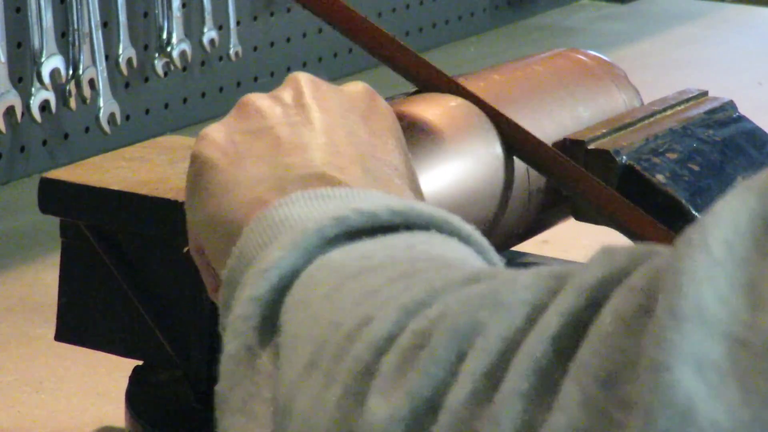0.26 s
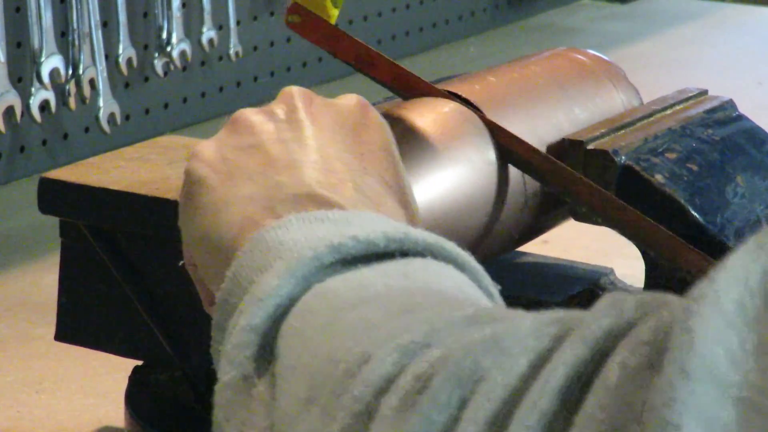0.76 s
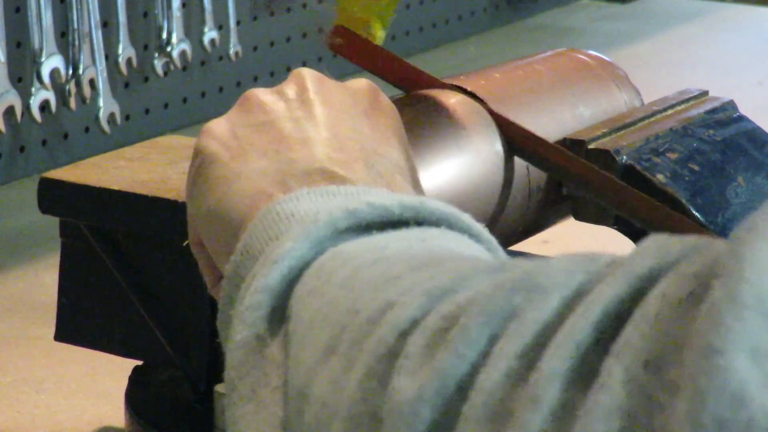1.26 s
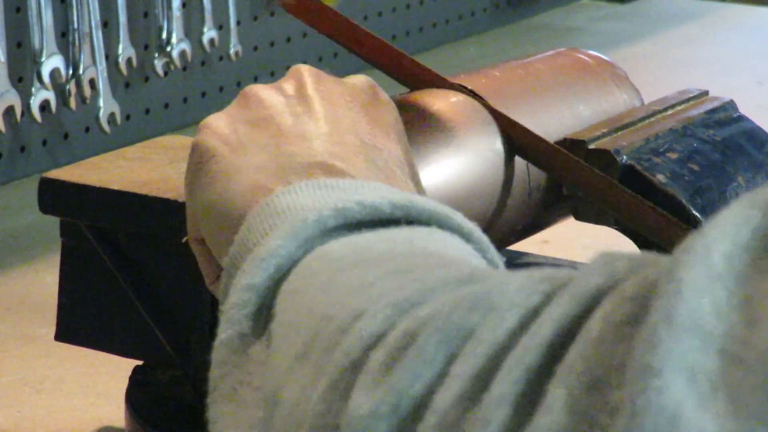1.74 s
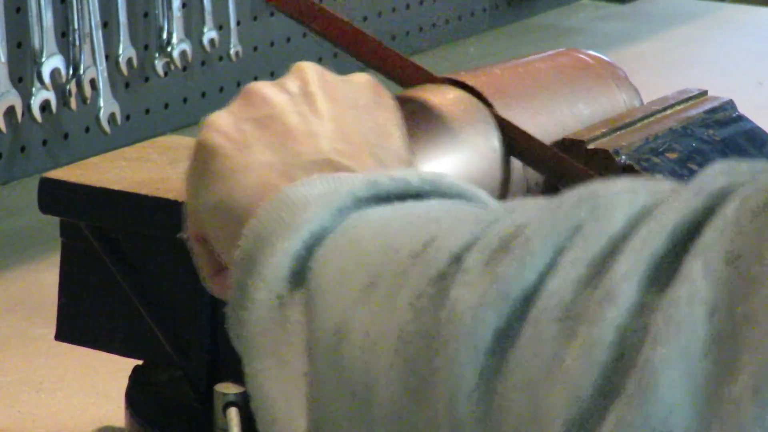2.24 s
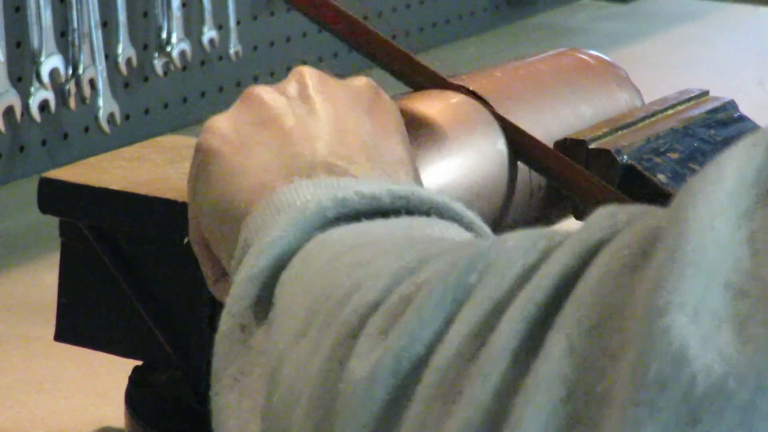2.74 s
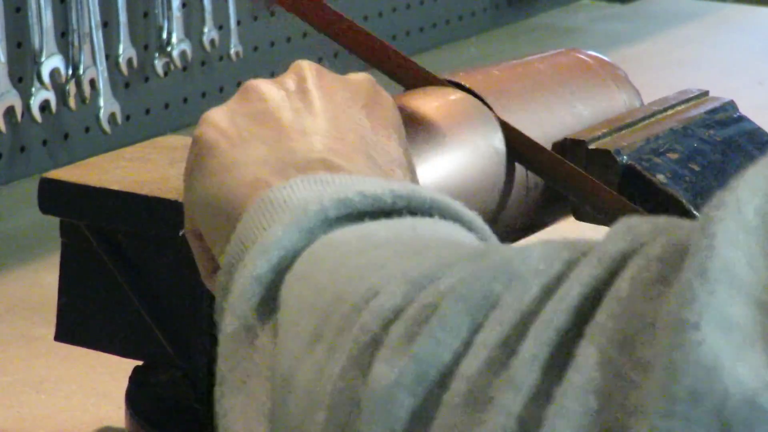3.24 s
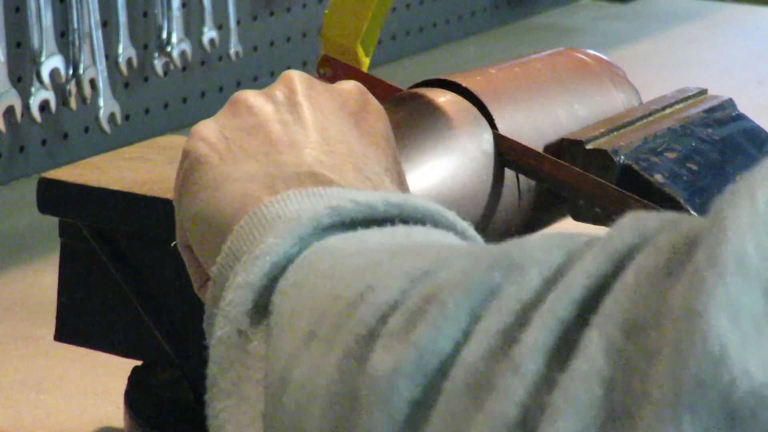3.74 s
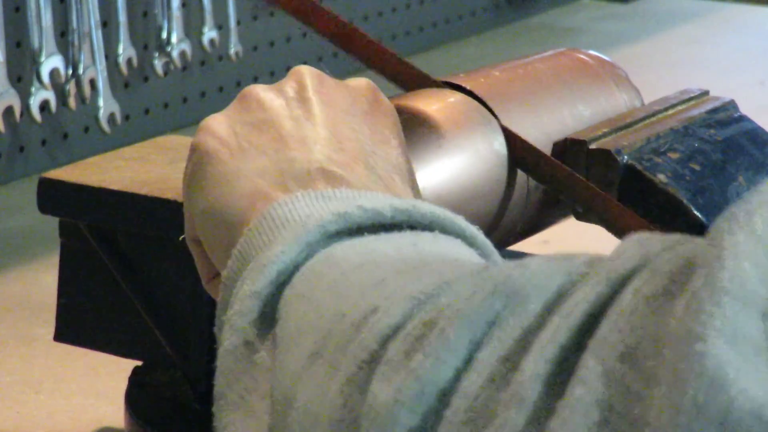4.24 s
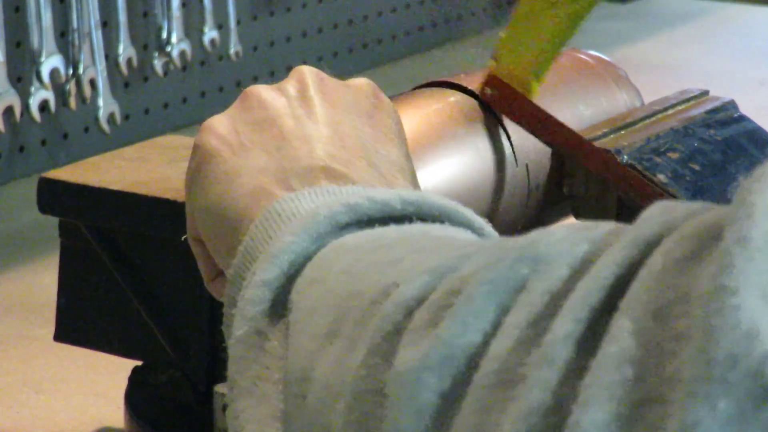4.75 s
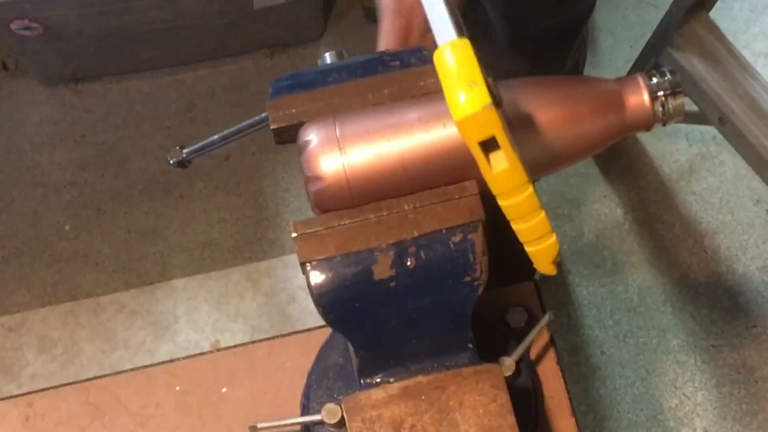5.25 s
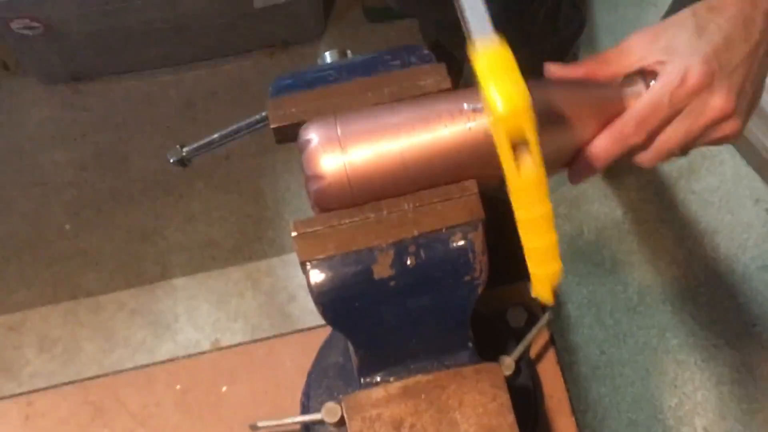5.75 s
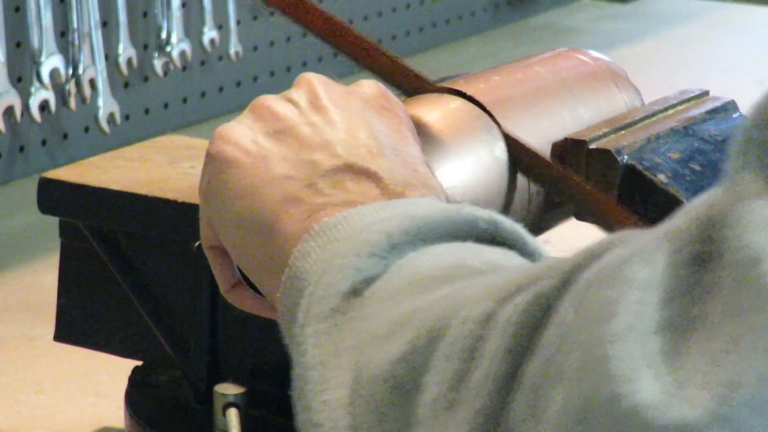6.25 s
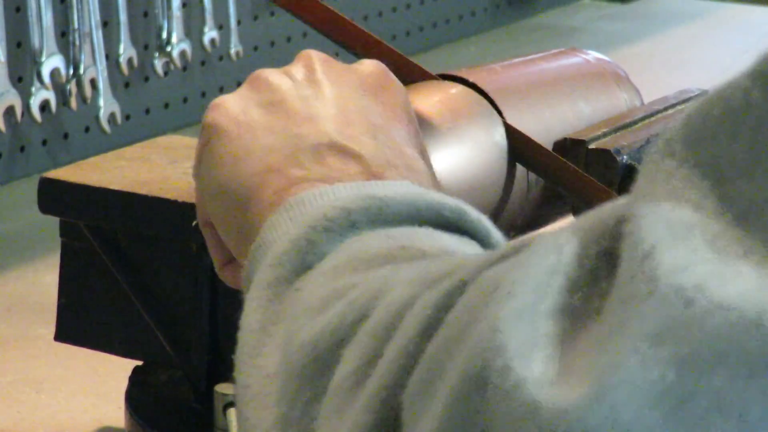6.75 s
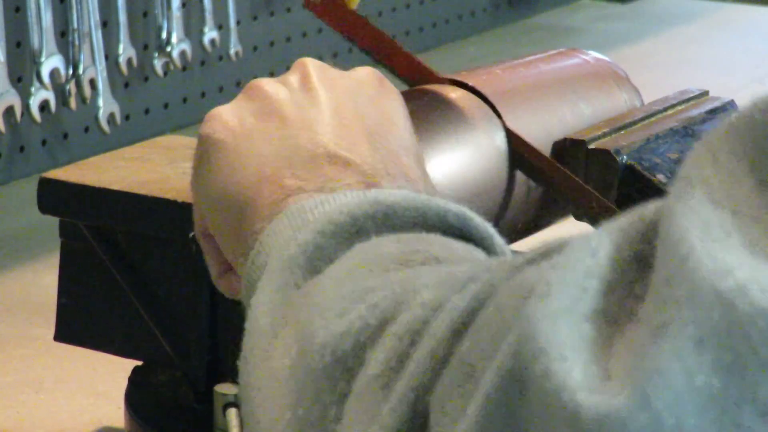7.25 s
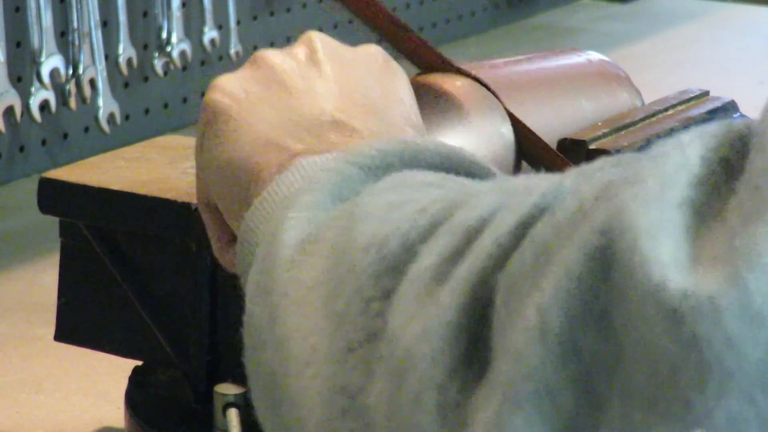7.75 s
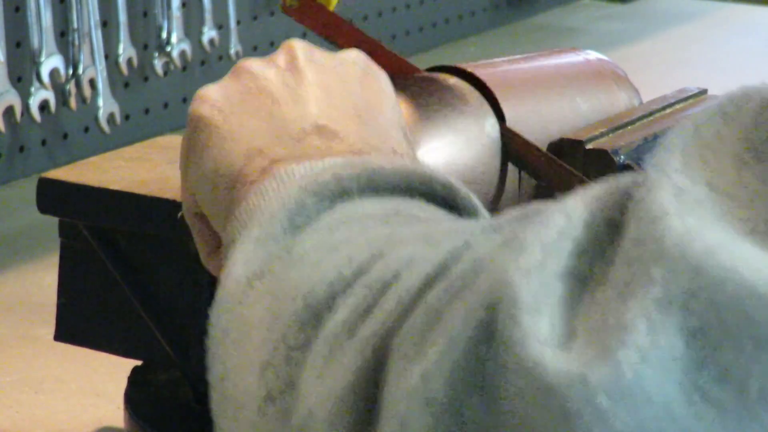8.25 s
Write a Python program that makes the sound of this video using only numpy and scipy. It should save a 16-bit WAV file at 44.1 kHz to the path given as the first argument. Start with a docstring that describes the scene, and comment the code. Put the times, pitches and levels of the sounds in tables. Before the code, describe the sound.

From the first instant a hacksaw rasps through a thin steel bottle in a vise, heard close from the side in stereo in a small workshop with a short echo. Strokes come fast, roughly six or seven a second, each a gritty burst with hollow ringing around 1 to 2 kHz and bright hiss. They vary in force, with small gaps near 0.8 and 1.7 seconds, and the loudest add low microphone crackle and thuds. From about 3.7 the strokes grow sparser and weaker. At 4.87 the sound becomes mono and overhead: quiet room tone, faint scrapes, a sharp tap near 5.27, then a cluster of clinks and knocks at 5.5 to 5.75 and short bright scratches until 6.05. A low rumble swells around 6.0. At 6.3 the strong, regular wide sawing resumes, crackling near 7.75 and 8.1, continuing until the end at about 8.5.

```python
"""In a small workshop, a hacksaw rasps through a thin steel bottle clamped in a bench vise. A stereo microphone
on the bench hears it from the side; for a while the scene changes to a mono microphone overhead, while the
blade is set back in the cut. The rasp is random tooth noise, shaped by each stroke and by the ringing steel;
blade taps are fading tones and noise. The low crackle of the overloaded microphone, the echo and the steady
room tone, which runs on through both views, are filtered noise."""
import sys
import numpy as np
from scipy import signal
from scipy.fft import rfft, irfft, next_fast_len
from scipy.io import wavfile
from scipy.ndimage import uniform_filter1d, map_coordinates

SR = 44100
rng = np.random.default_rng(int(sys.argv[2]) if len(sys.argv) > 2 else 0)


def wrap_up_sound(samples):
    """Save the sound to the file named by the first command line argument, as 16-bit audio."""
    columns = np.atleast_2d(samples).T
    # keep every value between -1 and 1, then stretch to whole-number steps
    tamed = np.clip(columns, -1, 1)
    steps = np.round(tamed * 32767).astype(np.int16)
    wavfile.write(sys.argv[1], SR, steps)


N = 374850

# Saw strokes and scrapes. Each row: start in seconds, attack in seconds, hold in seconds, rasp level in dB,
# change over the hold in dB, low shell modes in dB above the rasp, chip hiss in dB above the rasp,
# upper over lower half of the low modes in dB, upper over lower half of the rasp in dB.
SAW_STROKES = [(-0.044, 0.044, 0.0086, -22.5, -4, -3, -9, 0, 2.5),
               (0.038, 0.026, 0.055, -17.0, -0.5, -7, -7.5, -2, 1),
               (0.191, 0.004, 0.072, -21, 4, -5, -8, 1, 0),
               (0.331, 0.019, 0.037, -17, 2.0, -6.5, -7.5, -1.5, 1.5),
               (0.439, 0.021, 0.071, -17, 0.0, -3.5, -8.5, 6, -1.0),
               (0.589, 0.054, 0.014, -11.5, -4.5, -9, -8.5, -5, -1.5),
               (0.711, 0.012, 0.008, -25.5, -1, 0, -11, 5, -3),
               (0.895, 0.032, 0.048, -18.5, 0, -4.5, -9, -3.0, 3),
               (1.079, 0.0057, 0.093, -12.5, -3, -4.5, -9, 1.5, -1.5),
               (1.266, 0.015, 0.03, -17, 2, -7.0, -6.0, -3, 5),
               (1.369, 0.024, 0.088, -15.0, 0.5, -6, -9, 4.0, 1.5),
               (1.553, 0.014, 0.052, -17.5, -2, -6.5, -4.5, -2.0, 1),
               (1.832, 0.044, 0.03, -20, 1, -5, -5.5, -2, 3),
               (1.95, 0.0078, 0.022, -21, -10.0, -8.5, -17, 1, -4),
               (2.129, 0.047, 0.005, -19, 0, -7.5, -6, -3.5, 3.5),
               (2.269, 0.026, 0.084, -13.5, -3, -6.5, -6, 4.5, 1.5),
               (2.507, 0.064, 0.026, -20.5, -1.5, -5.5, -5.5, -1, 1),
               (2.636, 0.033, 0.058, -14.5, -0.5, -4.5, -6.0, 3.5, 0.5),
               (2.795, 0.043, 0.037, -17, -1.5, -6, -4.5, 2.5, -0.5),
               (2.926, 0.0044, 0.073, -18, 2.5, -6.5, -6.5, 3, -1),
               (3.07, 0.018, 0.051, -20.0, 1.5, -5.5, -5, -3.0, 3.5),
               (3.199, 0.0053, 0.056, -16, -3, -7.5, -6.5, -0.5, -1),
               (3.338, 0.02, 0.047, -16, -0.5, -7.5, -5, -2.0, 1.5),
               (3.451, 0.002, 0.008, -24, -4, -11, -2, 2, 8),
               (3.492, 0.0025, 0.098, -20, -4.5, -5.5, -5.0, 1.0, 3.5),
               (3.664, 0.03, 0.055, -20, -8.5, -7, -8, 0.0, 1),
               (3.932, 0.038, 0.025, -26, -0.5, -5.0, -6.5, -3, 1),
               (4.067, 0.028, 0.083, -17.5, -9, -8.5, -4.0, 0, 3.5),
               (4.36, 0.016, 0.089, -29.5, 4.5, -6.5, -8, -2, 1.5),
               (4.547, 0.0036, 0.008, -19, -5, -9.5, -2, 0.0, 4.5),
               (4.594, 0.0027, 0.018, -16, -2.5, -8, -4.5, -2, 5.5),
               (4.705, 0.023, 0.061, -20.5, -0.5, -5.5, -6.0, -4.5, 3),
               (5.07, 0.004, 0.081, -54.5, -4, -4, -11, 1, 2.0),
               (5.166, 0.004, 0.064, -46.0, -9, 3, -8, 0, 4.0),
               (5.267, 0.004, 0.008, -31, -5.5, 3, 3.5, 0.0, 2),
               (5.308, 0.004, 0.097, -41.5, -8.5, -2, -7.5, 3, 2),
               (5.485, 0.004, 0.091, -38.5, -6.5, -0.5, -3, 5, 6.0),
               (5.593, 0.0025, 0.0056, -23, -5, -12, -1.5, 2.5, 6.5),
               (5.642, 0.0033, 0.03, -31.0, -4.5, -8, -5.5, 5, -4),
               (5.721, 0.002, 0.007, -31, -5.5, -5, -10, 0.5, 7),
               (5.747, 0.0027, 0.02, -19, -2.0, -11.5, 3, 4, 4),
               (5.794, 0.0044, 0.032, -21.5, 2, -10, 0.5, 3, 1.5),
               (5.95, 0.043, 0.03, -21, -2, -10, -1, 2, 3),
               (6.033, 0.011, 0.0072, -26, -2.5, -3.5, 4, -7, 1),
               (6.319, 0.021, 0.006, -13.5, -3, -9, -5, -5, 4),
               (6.458, 0.0029, 0.072, -13.5, -1.0, -4.0, -7, -2, 3),
               (6.623, 0.033, 0.066, -14, -6.5, -7.5, -6.0, -6, 1.5),
               (6.788, 0.0083, 0.087, -16, 1, -6, -8, -1.0, 3),
               (6.956, 0.053, 0.035, -15, -5.0, -7, -5.5, -4, 1),
               (7.096, 0.004, 0.065, -16.5, 1.5, -5.5, -6.5, 1, 1.5),
               (7.25, 0.013, 0.061, -18, -1.5, -7, -5.5, -2.5, 1),
               (7.378, 0.004, 0.008, -23, -3.5, -9.5, -5.5, 2, 6),
               (7.541, 0.057, 0.043, -18, -4.5, -4, -8, -5.5, 1.5),
               (7.672, 0.011, 0.12, -15.5, -0.5, -7, -5, 3.5, 3.5),
               (7.871, 0.04, 0.056, -18.5, -4, -5, -7, -4, -1.5),
               (8.009, 0.024, 0.077, -17, -2.5, -4, -5, 0.5, 1.5),
               (8.181, 0.004, 0.081, -22.5, -3.5, -4, -7, -5, 1),
               (8.458, 0.046, 0.02, -22.5, 0.0, -4.5, -7.5, -8, 3)]
# Sudden grabs of the teeth. Each row: time in seconds, peak in dB before the offset of each band.
TOOTH_BITES = [(0.0633, -14), (0.3506, -26), (0.612, -19), (0.9104, -28), (1.081, -24), (2.294, -26),
               (2.8176, -18), (3.495, -23), (3.5279, -14), (4.084, -25), (4.16, -29), (5.993, -25),
               (6.33, -25), (6.461, -24), (6.4924, -22), (6.5194, -24), (6.6336, -23), (6.794, -23),
               (6.9833, -15), (7.681, -22), (8.0213, -26)]
# Five bands: two of low modes, two of rasp, one of hiss. Each row: lower edge in Hz, upper edge in Hz.
RASP_BANDS = [(60, 827), (900, 1196), (1350, 2027), (2100, 4540), (4700, 30000)]
# How fast each band dies as the blade slows. One value per band, in dB per second.
RELEASE_SPEEDS = [-270, -270, -290, -310, -320]
BITE_BAND_OFFSETS_DB = [-15, -2.5, 0, -2.5, -6.5]  # one value per band, added to the bite's peak
# Ringing of the bottle's shell. Each row: frequency in Hz, width in Hz, level in dB over the direct sound.
BOTTLE_MODES = [(556, 14, -8), (743, 32, 3), (825, 120, -0.5), (966, 22, 4), (1093, 75, 12.5),
                (1596, 126, 4), (1690, 16, -4.5), (1804, 30, 8), (1850, 35, 8), (1960, 66, -11),
                (2197, 34, 1.5), (2360, 110, 2), (2550, 24, -13), (2690, 63, -3.5), (3191, 46, 6),
                (3417, 110, -0.5), (4074, 44, 1.5), (4220, 23, -28), (5210, 14, -2), (5305, 37, 1.5)]
# Tone of the rasp from the side, before each band is evened out. Each row: frequency in Hz, relative dB per Hz.
SIDE_TONE = [(88, -47), (150, -22), (281, -13.5), (547, -6), (640, -10.5), (735, -9), (1070, -2.5),
             (1380, -6), (1850, -3), (2080, -6), (2380, -4.5), (3820, -12), (12400, -11.5), (14500, -15.5),
             (16300, -46)]
# Tone of the rasp from overhead, used the same way. Each row: frequency in Hz, relative dB per Hz.
OVERHEAD_TONE = [(88, -26), (150, -21), (496, -6.5), (558, -15.5), (1250, -8), (1880, -5), (2120, -7.5),
                 (2580, -3), (4550, -16.5), (5990, -6.5), (7890, -8), (13900, -0.5), (16300, -23)]
# How wide the rasp is. Each row: frequency in Hz, side over mid in dB.
STEREO_WIDTH = [(100, -24.5), (400, -28), (800, -26), (1500, -17), (3000, -12), (6000, -6.5), (10000, -4),
                (15000, -2.5)]
# Length of the workshop's echo. Each row: frequency in Hz, time to fall 60 dB in seconds.
ECHO_TIMES = [(200, 0.29), (1500, 0.31), (4000, 0.43), (10000, 0.29), (16000, 0.14)]
# Low overload bursts of the microphone. Each row: time in seconds, opposite-channel rms in dB at its height,
# shared thud in dB above it before the thud is dulled.
OVERLOAD_BURSTS = [(0.087, -25, -4), (1.13, -20, -12), (1.446, -19, -11), (1.58, -18.5, -13.5),
                   (2.328, -17, -7), (2.362, -18, -12), (2.724, -20, -7.5), (2.983, -13.5, -12),
                   (3.113, -19.5, -8), (3.255, -19.5, -13), (3.457, -32, -2), (3.497, -32, -10),
                   (3.545, -9.5, -7), (4.114, -13.5, -2.5), (4.169, -24, -7), (4.606, -22.5, -10.5),
                   (7.128, -25, -18), (7.294, -22.5, -13), (7.709, -25, -0.5), (7.761, -12.5, -8.5),
                   (8.083, -12, -7)]
# Tone of the overload crackle. Each row: frequency in Hz, relative dB per Hz.
CRACKLE_TONE = [(30, -24), (70, -13), (130, -4), (350, 0), (600, -4), (1000, -10), (1600, -30), (3000, -80)]
# Swelling low sounds of the room. Each row: time in seconds, drone level in dB, rumble level in dB.
LOW_SWELLS = [(0.0, -47.5, -56), (0.85, -49.5, -53), (1.25, -44.5, -58), (1.94, -52, -59),
              (2.93, -48.5, -54), (3.34, -43, -48), (3.86, -61, -64), (4.26, -45, -53), (4.43, -48.5, -57),
              (5.23, -53, -47), (6.01, -31.5, -34.5), (6.15, -39, -40), (6.72, -48.5, -55),
              (7.65, -51.5, -56), (7.88, -47.5, -52), (8.5, -55, -55)]
# Tone of the steady air noise. Each row: frequency in Hz, relative dB per Hz.
AIR_TONE = [(15, -28), (25, -6), (120, 4), (176, -20), (225, -16), (356, -21.5), (1380, -31), (1860, -35),
            (13900, -57), (15000, -57), (16300, -59)]
# The low drone's resonance. One row: frequency in Hz, width in Hz, level in dB over the flat noise.
DRONE_MODE = (121.4, 17, 16)
# When the overhead microphone is heard. One row: start in seconds, end in seconds.
OVERHEAD_SPAN = (4.872, 6.31)
# The blade taps steel. Each row: time in seconds, tap level in dB, shell note in dB above it, blade ping in dB above it.
BLADE_TAPS = [(4.8713, -27, -25, -13), (4.8823, -28, -19, -8), (5.1048, -32.5, -18, -31),
              (5.1387, -48, -10, -15), (5.1696, -41, -10, -18), (5.205, -46, -9, -18),
              (5.2669, -13.5, -29, -4), (5.3134, -24, -16, -18), (5.433, -38, -12, -20),
              (5.4874, -21, -14, -13), (5.5692, -26.5, -3.5, -18), (5.594, -20, -25, -17),
              (5.626, -20, -19, -13), (5.6479, -11, -27, -19), (5.6801, -21, -18, -17),
              (5.721, -34, -6, -4), (5.751, -20, -33, -16)]
# Frame and bottle as they ring upwards; in a tap the first row is the knock, the second the shell note, the last
# the ping, the rest the ring. Each row: frequency in Hz, relative level in dB, time to fall 60 dB in seconds.
FRAME_MODES = [(679, -2, 0.18), (1200, 10, 0.23), (1740, 4, 0.087), (1870, 6, 0.058), (2000, -2, 0.063),
               (2270, -3, .08), (2513, -2, 0.059), (3584, 8, 0.044), (4320, 1, 0.027), (5810, 8.5, 0.019),
               (7300, 0, 0.071), (8000, 1, 0.073), (11100, 15, 0.0092), (12500, -2, .025), (13500, 0, .1)]

ATTACK_RISE_DB = 14.5  # a stroke starts this far under its level
HISS_GROWS_DB = 0.5  # chips hiss more towards the end of the hold
HISS_LAG_DB, HISS_LAG_S = -3.5, 0.025  # the hiss comes up a little after the rasp
BITE_T60_S = 0.054  # time for a bite to fall 60 dB
BURST_S = 0.0099  # from a burst's height until its gain is down to about a third
THUD_DEEP_HZ = 110  # around and under this the thud's tone is fuller than the crackle's
SCRAPE_RING_DB = -4  # added to the frame's levels: scraping rings it less than a tap does
KNOCK_DB = -7  # above the shell note
RING_DB, CRACK_DB = -16, -11  # added to the tap level; the ring also follows half the note's dB
TOP_HZ = 16450  # band limit


def amp(db):
    """Turns decibels into gain."""
    return 10 ** (np.asarray(db) / 20)


def unit(x):
    """Scales to rms 1."""
    return x / np.sqrt(np.mean(np.abs(x) ** 2) + 1e-20)


def along(points, hz):
    """Reads a curve between (Hz, value) points, on a log frequency axis."""
    f, v = np.transpose(points)
    return np.interp(np.log(hz + 1), np.log(f + 1), v)


def filtered(x, response):
    """Multiplies the spectrum of x by a response, given as a function of frequency."""
    m = 2 * next_fast_len(x.shape[-1] // 2 + SR // 4)
    spectrum = rfft(x, m) * response(np.fft.rfftfreq(m, 1 / SR))
    return irfft(spectrum, m)[..., :N]


def causal(gain, size):
    """Gives a smooth gain the phase of a filter that answers as early as it can, on size spectrum points."""
    cepstrum = irfft(np.log(np.maximum(gain, 1e-6)))
    middle = len(cepstrum) // 2
    cepstrum[1:middle] *= 2  # fold the backward half onto the forward half
    cepstrum[middle + 1:] = 0
    impulse = irfft(np.exp(rfft(cepstrum)))
    return rfft(impulse, 2 * size - 2)


def modes(table, f):
    """Adds resonances to a flat response: each one peaks at its own frequency."""
    return 1 + sum(amp(db) * 1j * f * w / (c * c - f * f + 1j * f * w) for c, w, db in table)


def stroke_gains(strokes, bites):
    """Makes one gain per band: each stroke rises, holds and dies away; a bite is a sudden peak on top."""
    t = np.arange(SR * 2 // 5) / SR
    gains = np.zeros((len(RASP_BANDS), N + 2 * SR))  # a spare second at each end
    half_db = 10 * np.log10(.5)  # two halves share the power
    for s, attack, hold, db, change_db, low_db, hiss_db, low_tilt_db, rasp_tilt_db in strokes:
        held = np.clip((t - attack) / hold, 0, 1)
        rise_db = -ATTACK_RISE_DB * np.clip(1 - t / attack, 0, 1)
        level_db = db + rise_db + change_db * held
        low_halves_db = [low_db - low_tilt_db / 2, low_db + low_tilt_db / 2]
        rasp_halves_db = [-rasp_tilt_db / 2, rasp_tilt_db / 2]
        halves_db = half_db + np.array(low_halves_db + rasp_halves_db)
        chips_db = hiss_db + HISS_GROWS_DB * (held - .5) + HISS_LAG_DB * np.exp(-t / HISS_LAG_S)
        layers_db = np.vstack([halves_db[:, None] + 0 * t, chips_db])
        release_db = np.outer(RELEASE_SPEEDS, np.maximum(t - attack - hold, 0))
        gains[:, SR + round(s * SR):][:, :len(t)] += amp(level_db + layers_db + release_db)
    for s, db in bites:
        bite_db = db - 60 * t / BITE_T60_S + np.transpose([BITE_BAND_OFFSETS_DB])
        gains[:, SR + round(s * SR):][:, :len(t)] += amp(bite_db)
    return gains[:, SR:SR + N]


def teeth(rate, scatter_db, grit):
    """Teeth catch the wall at uneven moments and strengths, rate times a second, over the grit of tearing chips."""
    caught = rng.random(N) < rate / SR
    catches = caught * amp(scatter_db * rng.standard_normal(N))
    return unit(catches - catches.mean()) + grit * rng.standard_normal(N)


def patchy(x, depth_db):
    """Random gain patches about a stroke long: the blade angle favours now some modes, now others."""
    z = signal.stft(x, nperseg=512)[2]
    across_hz = uniform_filter1d(rng.standard_normal(z.shape), size=3, axis=0)
    field = uniform_filter1d(across_hz, size=14, axis=1)
    return signal.istft(z * amp(depth_db * unit(field)), nperseg=512)[1][:N]


def saw(strokes, colour, resonances, bites, channels=1):
    """The teeth drive the steel into ringing: low modes, main rasp and chip hiss follow each stroke."""
    t = np.arange(N) / SR
    gains = stroke_gains(strokes, bites)
    # the blade skips a little: a smooth random curve with 45 points a second
    chatter = map_coordinates(rng.standard_normal(int(N * 45 / SR) + 40), [t * 45])
    grinding = [unit(patchy(teeth(rate=2200, scatter_db=2.0, grit=1.0), depth_db=2.0)) for _ in range(channels)]
    drive = amp(0.98 * chatter) * grinding

    def above(f, edge_hz):
        """Passes what lies above an edge."""
        return 1 / np.sqrt(1 + (edge_hz / (f + 1)) ** 12)

    def share(f, lo, hi):
        """Passes what lies between two edges."""
        return above(f, lo) * np.sqrt(1 - above(f, hi) ** 2)

    def body(f):
        """The ringing steel as one response per band, each of rms 1."""
        coarse = np.fft.rfftfreq(8192, 1 / SR)
        ringing = modes(resonances, f)
        tone = amp(along(colour, coarse))
        bands = [unit(causal(tone * share(coarse, lo, hi), size=len(f)) * ringing) for lo, hi in RASP_BANDS]
        return np.array(bands)[:, None]
    return filtered(drive * gains[:, None], body).sum(axis=0)


def widened(mid, other):
    """The two ports face different parts of the shell, so part of the rasp is unlike from port to port."""
    side = filtered(other, lambda f: amp(along(STEREO_WIDTH, f)))
    return np.array([mid + side, mid - side])


def room(x, wet_db):
    """The workshop's echo is a noise tail in which each frequency dies at its own speed."""
    hz, t, z = signal.stft(rng.standard_normal((2, SR // 2)), SR, nperseg=256)
    fade_db = -60 * t / along(ECHO_TIMES, hz)[:, None]
    tail = signal.istft(z * amp(fade_db), SR, nperseg=256)[1]
    delayed = np.pad(x, (250, 0))[None]  # 250 samples late
    return amp(wet_db) * signal.fftconvolve(delayed, tail / np.linalg.norm(tail[0]), axes=1)[:, :N]


def overload(rasp):
    """The microphone overloads at loud strokes: low crackling bursts, opposite in the two channels, with a shared thud."""
    t = np.arange(N) / SR
    power = np.abs(uniform_filter1d(rasp ** 2, size=600))
    size = amp(-14.5) * power ** 0.83 * amp([[0], [-14]])  # crackle and thud grow with the stroke
    for s, db, thud_db in OVERLOAD_BURSTS:
        near = slice(max(round((s - .1) * SR), 0), round((s + .1) * SR))
        size[:, near] += amp([[db], [db + thud_db]]) * np.exp(-((t[near] - s) / BURST_S) ** 2)

    def tones(f):
        """One response for the crackle, one for the deeper and duller thud."""
        deeper = 1 + (THUD_DEEP_HZ / (f + 30)) ** 2
        duller = [np.ones_like(f), deeper / np.sqrt(1 + (f / 380) ** 6)]
        return unit(amp(along(CRACKLE_TONE, f))) * duller
    crackle, thud = filtered(size * rng.standard_normal((2, N)), tones)
    return np.array([thud + crackle, thud - crackle])


def room_tone():
    """Steady air noise, alike at both ports except low down, with a drone and a rumble that swell."""
    times, *levels = np.transpose(LOW_SWELLS)
    drone_db, rumble_db = [np.interp(np.arange(N) / SR, times, level) for level in levels]

    def noise(response):
        """Filtered noise of rms 1."""
        return unit(filtered(rng.standard_normal(N), response))
    air = noise(lambda f: amp(along(AIR_TONE, f)) * (f > 160))
    unlike = noise(lambda f: amp(along([(60, -10), (250, 8), (1200, -8), (2500, -46)], f)))
    drone = noise(lambda f: modes([DRONE_MODE], f) * (f > 90) * (f <= 180))
    rumble = noise(lambda f: amp(along([(15, -27), (35, -8), (80, -6.5)], f)) * (f <= 95))
    alike = amp(-48.5) * air + amp(drone_db) * drone + amp(rumble_db) * rumble
    return alike + amp(-64) * unlike * [[1], [-1]]


def taps():
    """Each tap rings the frame at new strengths, with a crack, a dull knock, a blade ping and the shell's long note."""
    out, t = np.zeros(N + SR), np.arange(SR // 6) / SR

    def tone(hz, start_db, t60, wobble=0.0):
        """A fading sine; wobble is the random phase step per sample in radians, which roughens it."""
        phase = rng.normal(0, wobble, len(t)).cumsum()
        return amp(start_db - 60 * t / t60) * np.sin(2 * np.pi * hz * t + phase)
    knock_hz, _, knock_t60 = FRAME_MODES[0]
    note_hz, _, note_t60 = FRAME_MODES[1]
    ping_hz, _, ping_t60 = FRAME_MODES[-1]
    for s, db, note_db, ping_db in BLADE_TAPS:
        ring_db = RING_DB + note_db / 2
        ring = sum(tone(hz, ring_db + level + rng.normal(0, 5.6), t60) for hz, level, t60 in FRAME_MODES[2:-1])
        ping = tone(ping_hz, ping_db, ping_t60, wobble=.04)
        # steps between noise samples make the crack bright
        crack = np.diff(rng.standard_normal(len(t) + 1)) * amp(CRACK_DB - 60 * t / 0.034)
        knock = tone(knock_hz, note_db + KNOCK_DB, knock_t60, wobble=0.056)
        note = tone(note_hz, note_db, note_t60)
        out[round(s * SR):][:len(t)] += amp(db) * (ping + ring + crack + knock + note)
    return out[:N]


def scene():
    """Plays the side microphone, switched to the mono overhead one for a while, over the room tone."""
    start, end = OVERHEAD_SPAN
    heard_above = [row for row in SAW_STROKES if start < row[0] < end]
    heard_beside = [row for row in SAW_STROKES if row not in heard_above]
    bites_above = [row for row in TOOTH_BITES if start < row[0] < end]

    near, other = saw(heard_beside, SIDE_TONE, BOTTLE_MODES, bites=TOOTH_BITES, channels=2)
    side_view = amp(-0.5) * widened(near, other) + room(near, wet_db=-11.0) + overload(near)

    # decay time sets the width
    upwards = [(hz, np.log(1000) / np.pi / t60, db + SCRAPE_RING_DB) for hz, db, t60 in FRAME_MODES[:10]]
    above = saw(heard_above, OVERHEAD_TONE, upwards, bites=bites_above)[0] + taps()
    top_view = above + room(above, wet_db=-15.5)[0]

    t = np.arange(N) / SR
    overhead = (t > start) & (t < end)
    return np.where(overhead, top_view, side_view) + room_tone()


def record(dry):
    """Peaks clip softly; the deepest bass is rolled off and nothing is kept above the band limit."""
    clipped = dry / (1 + np.abs(dry) ** 4) ** (1 / 4)
    return filtered(clipped, lambda hz: 1j * hz / (35 + 1j * hz) * (hz < TOP_HZ))


dry = scene()
out = record(dry)
wrap_up_sound(out)
```